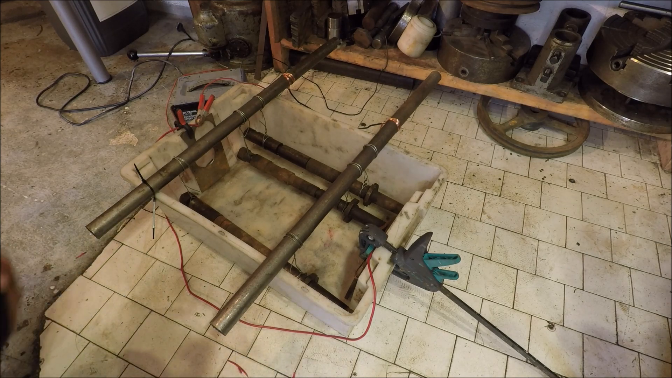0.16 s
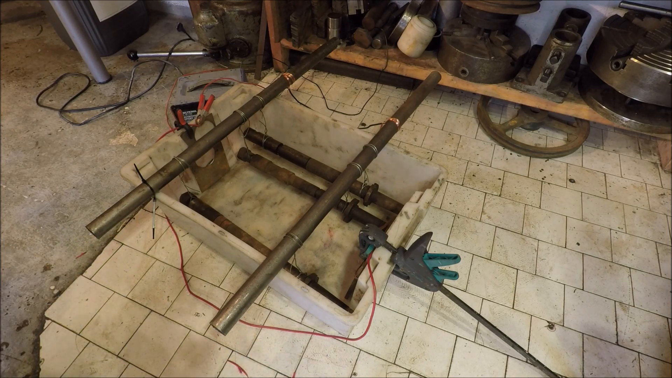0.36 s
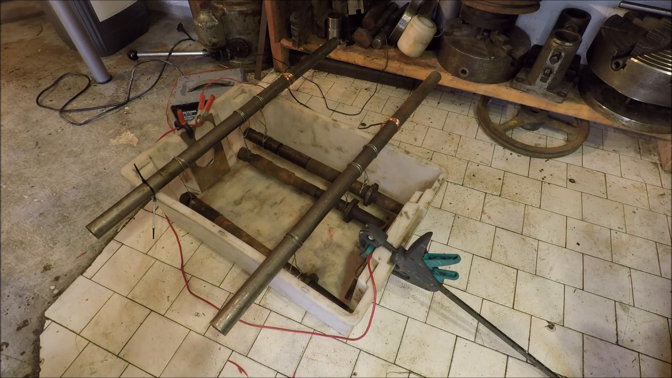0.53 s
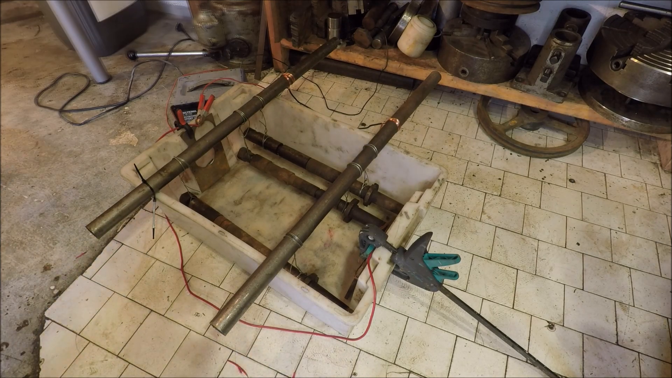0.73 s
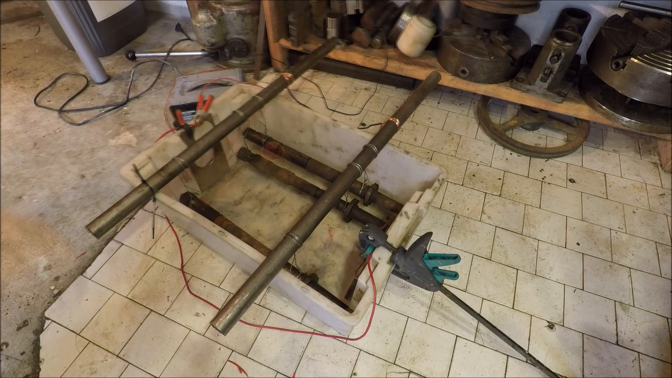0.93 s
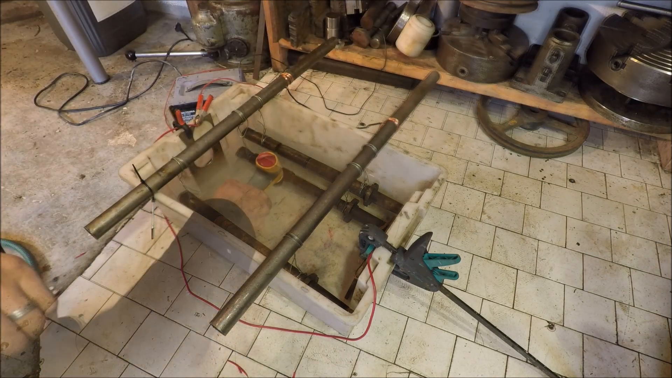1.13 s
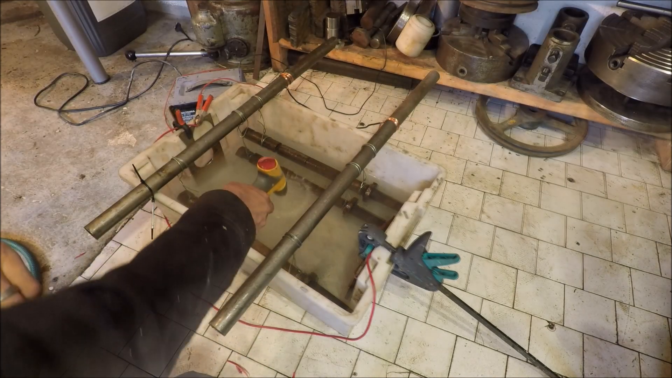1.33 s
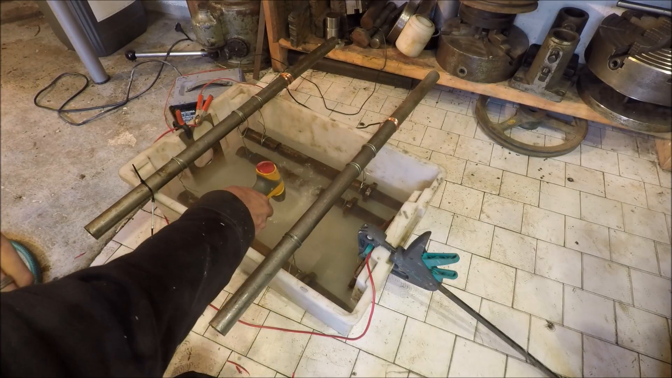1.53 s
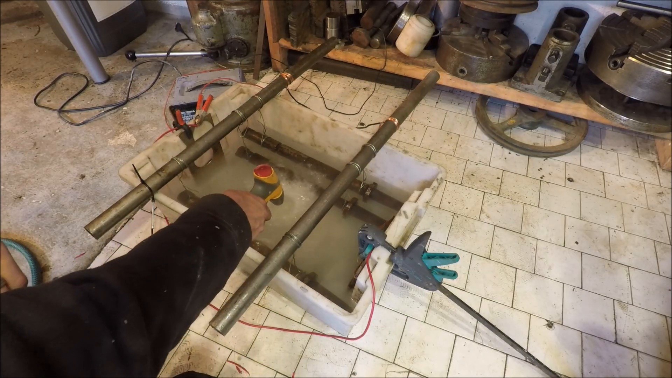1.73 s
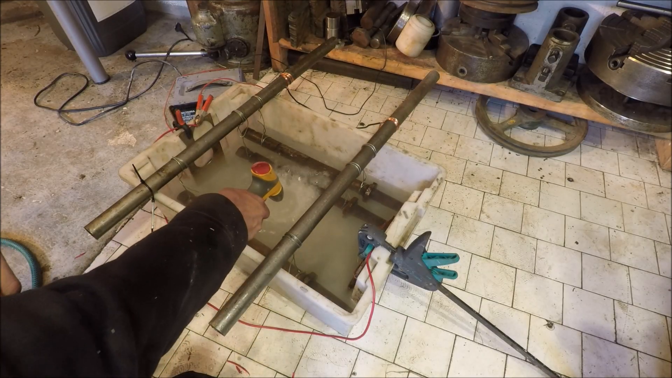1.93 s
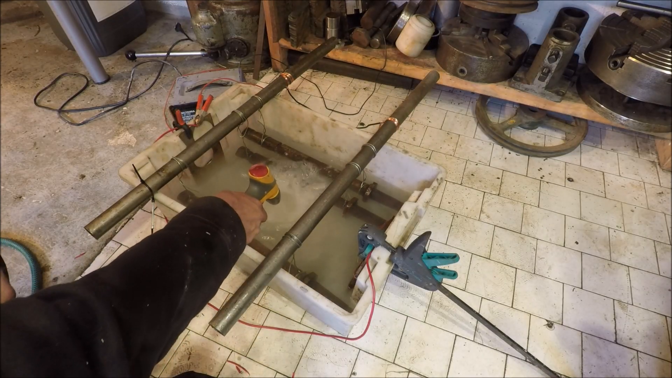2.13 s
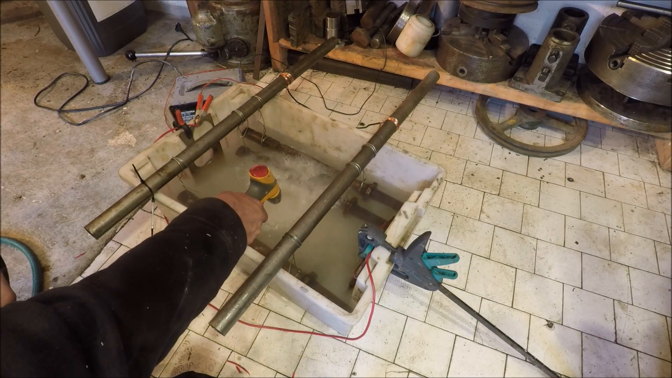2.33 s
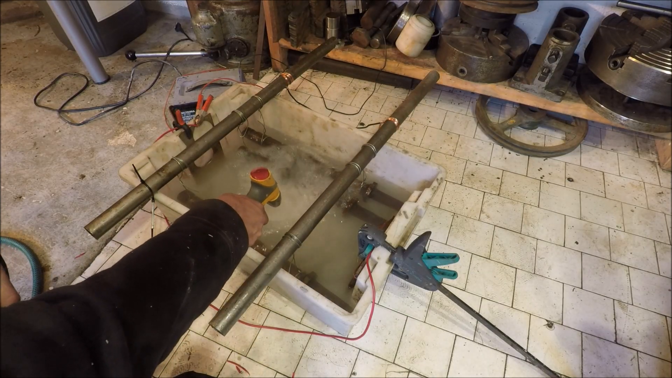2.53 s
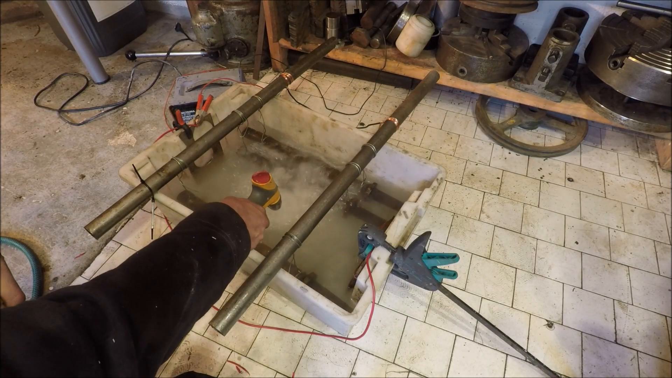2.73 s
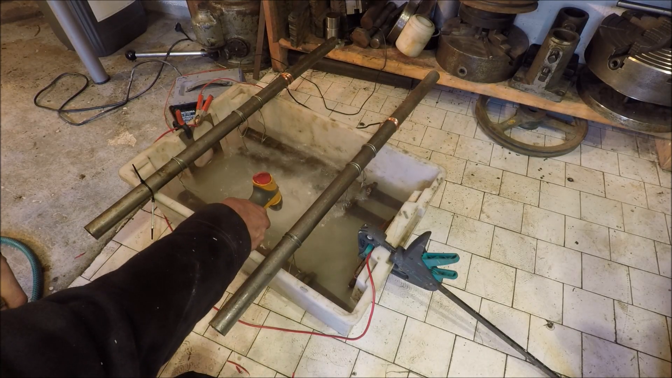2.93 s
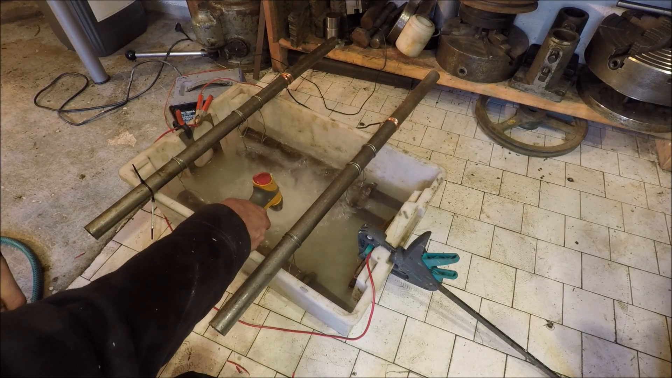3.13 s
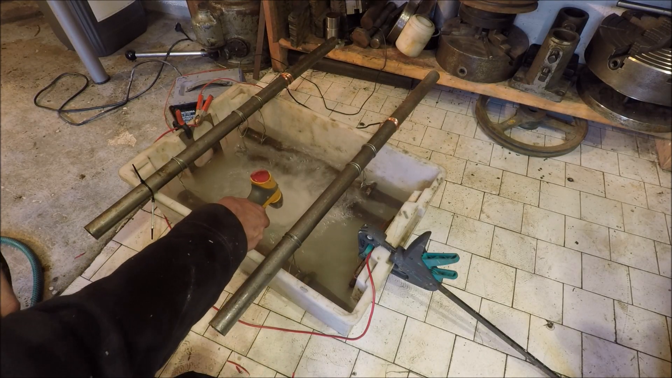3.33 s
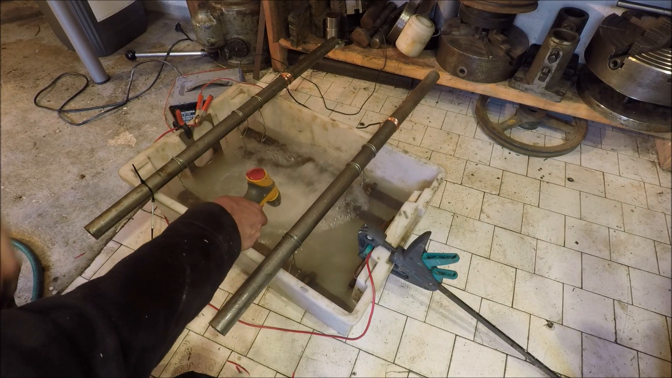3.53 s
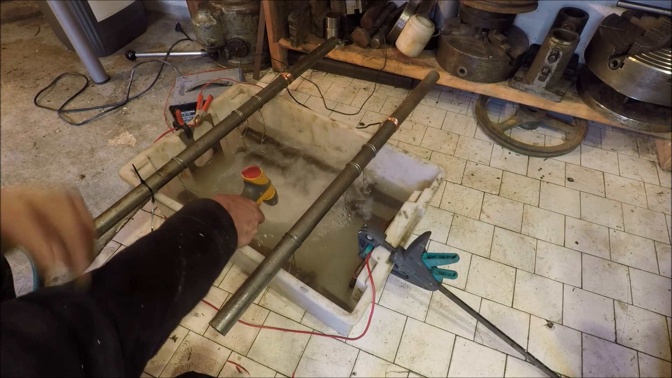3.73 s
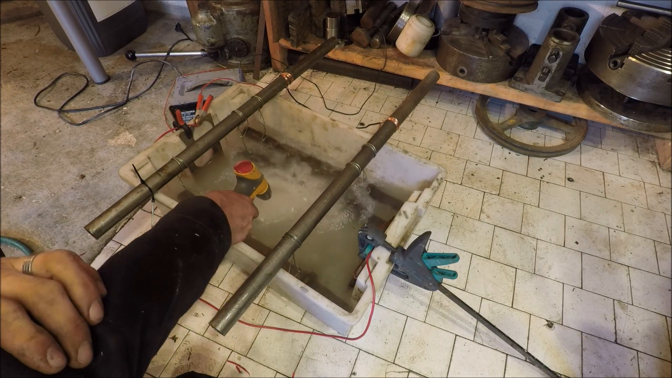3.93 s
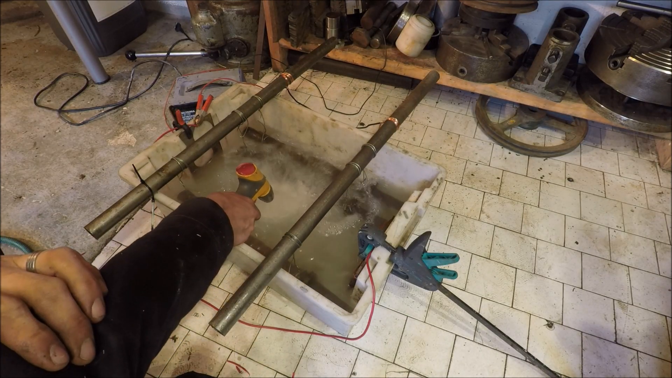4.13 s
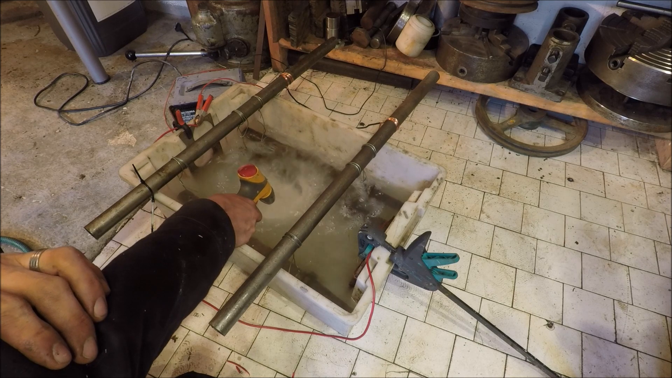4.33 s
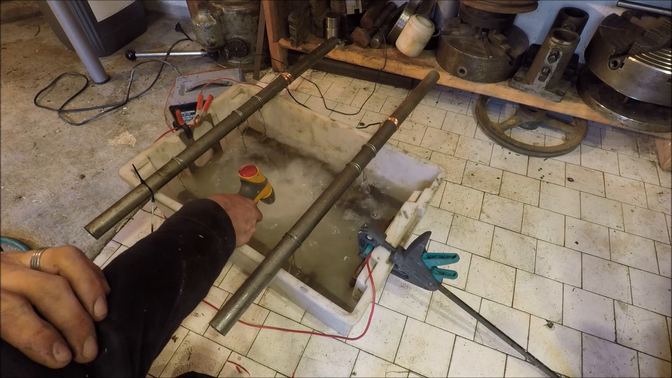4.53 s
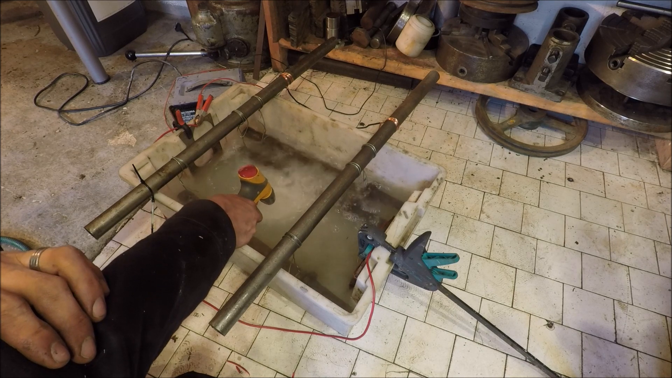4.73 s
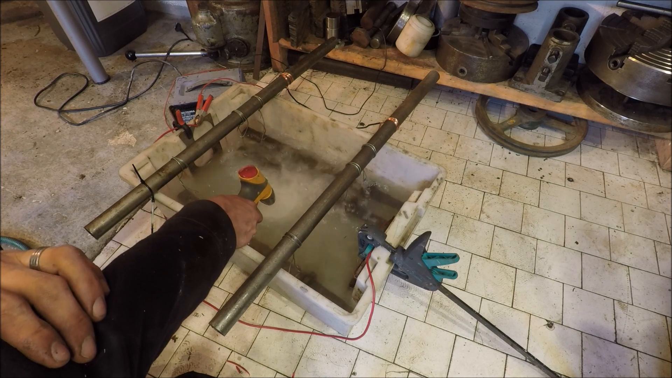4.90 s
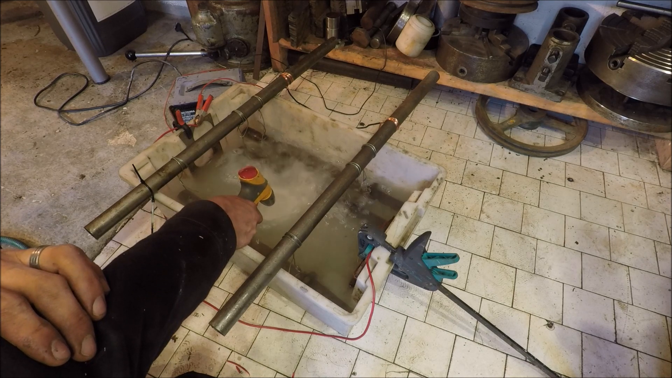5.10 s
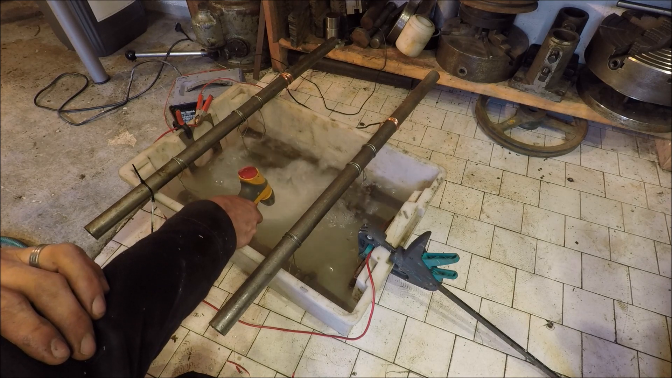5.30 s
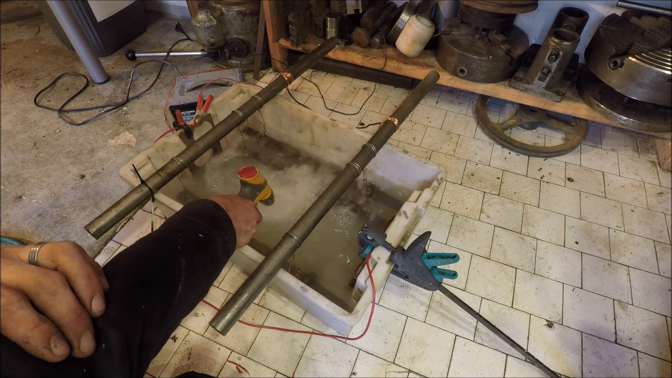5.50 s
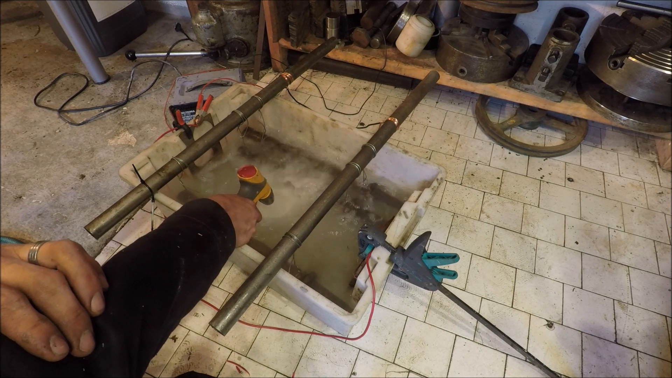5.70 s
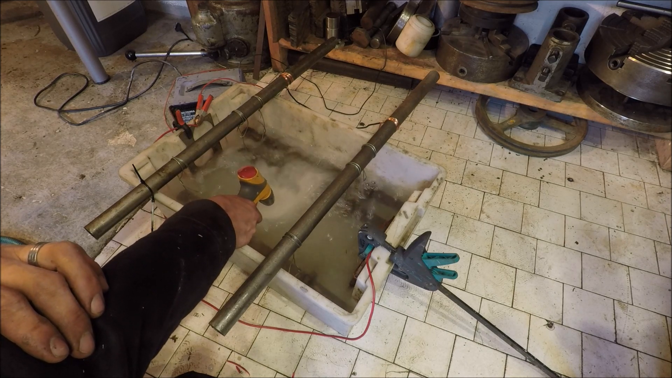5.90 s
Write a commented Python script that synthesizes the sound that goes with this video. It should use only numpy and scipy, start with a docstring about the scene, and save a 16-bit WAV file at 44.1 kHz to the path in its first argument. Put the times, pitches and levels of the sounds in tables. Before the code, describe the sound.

After brief fumbling, clicks and a ringing knock, a bright water jet bursts on and keeps splashing into a tub, its level flickering.

```python
"""A hose gun sprays into a tub of water on a workshop floor, heard by a small mono camera worn on the body.
First room noise, cloth rustling as grainy noise, and low decaying jolts; the sound cuts out once.
Then the camera sways on its mount, the gun clicks, and two knocks ring it as decaying sines.
The jet hisses as drop-laden noise with a whistle; drops patter, bubbles chirp and the tub resonates.
From the spray on, the level dips briefly many times, and a few thin tones sound in each dip."""
import sys
import numpy as np
from scipy import signal
from scipy.fft import rfft, irfft, next_fast_len
from scipy.io import wavfile
from scipy.ndimage import uniform_filter1d

SR = 44100
rng = np.random.default_rng(int(sys.argv[2]) if len(sys.argv) > 2 else 0)


def wav_out(sig):
    """Save sig, one row per channel (or a flat mono array), as 16-bit PCM at SR to the path in sys.argv[1]."""
    wavfile.write(sys.argv[1], SR, np.round(np.clip(np.atleast_2d(sig).T, -1, 1) * 32767).astype(np.int16))


N = 262836
T = np.arange(N) / SR


def undb(db):
    """Amplitude ratio of a level in dB."""
    return 10 ** (np.asarray(db) / 20)


def level(x, db):
    """Scale to an rms level in dB."""
    return x * undb(db) / np.sqrt(np.mean(x ** 2))


def colour(x, points):
    """Shape a spectrum by (frequency [Hz], level [dB]) points, falling away outside them; rms 1."""
    hz, db = np.transpose(points)
    size = next_fast_len(N)
    log_hz = np.log(np.arange(size // 2 + 1) * SR / size + 1)
    outside = np.maximum(np.log(hz[0]) - log_hz, 0) + np.maximum(log_hz - np.log(hz[-1]), 0)
    gain = undb(np.interp(log_hz, np.log(hz), db) - 52 * outside)
    return level(irfft(rfft(x, size) * gain, size)[:N], 0)


def resonance(x, hz, width_hz):
    """One resonant mode driven by x."""
    return signal.lfilter(*signal.iirpeak(hz, hz / width_hz, fs=SR), x)


def split(x, hz):
    """Parts below and above a frequency."""
    return (signal.sosfilt(signal.butter(4, hz, kind, fs=SR, output="sos"), x) for kind in ("low", "high"))


def walk(rate_hz):
    """Random levels held 1 / rate and slewed twice; spread near 1."""
    hold = max(int(SR / rate_hz), 2)
    steps = np.resize(np.repeat(rng.standard_normal(4000), hold), N)
    return 1.4 * uniform_filter1d(uniform_filter1d(steps, hold), hold)


def patter(share, spread_db):
    """Noise with drops: a share of the samples carry a hit, a few much larger."""
    hit = rng.random(N) < share
    size = undb(np.minimum(spread_db * rng.exponential(size=N), 24))
    noise = rng.standard_normal((2, N))
    return noise[0] + hit * size * noise[1]


def ring(start_s, hz, db, t60_s):
    """A struck mode: a sine that decays 60 dB in t60."""
    t = np.maximum(T - start_s, 0)
    return undb(db - 60 * t / t60_s) * np.sin(2 * np.pi * hz * t)


def hump(x):
    """One smooth hump between -.5 and .5."""
    return np.cos(np.pi * np.clip(x, -.5, .5))


def swell(peak_s, db, rise_s, fall_s):
    """Gain that climbs to a peak and fades, 10 dB in each of the given times."""
    return undb(db - 10 * np.maximum((peak_s - T) / rise_s, (T - peak_s) / fall_s))


# room noise: (frequency [Hz], relative density [dB])
ROOM_COLOUR = [(25, -5), (50, -9), (70, -11.5), (88, -1), (110, -11), (200, -12.5), (600, -17), (2000, -30),
               (6000, -52), (15000, -30)]
ROOM_DB = -40.5


def room_noise():
    """Steady room noise, mostly low, with a slowly wandering level."""
    noise = colour(rng.standard_normal(N), ROOM_COLOUR)
    return level(noise * undb(1.8 * walk(2.4)), ROOM_DB)


# cloth noise before the treble is rebalanced: (frequency [Hz], relative density [dB])
CLOTH_COLOUR = [(71, -38), (120, -6), (387, -8), (592, 0), (1590, -1.5), (3720, 0), (4290, -6),
                (5570, -5.5), (7700, -15.5), (15000, -19)]
# rubs of cloth and shoes: (loudest [s], level [dB], 10 dB swell [s], 10 dB fade [s])
CLOTH_RUBS = [(.09, -33.5, .25, .2), (.235, -26.5, .09, .13), (.375, -26.5, .06, .08),
              (.484, -15, .035, .068), (.94, -37, .1, .08), (1.13, -27, .006, .07)]
STIR_DB, RUB_TREBLE_DB = -42.5, -10.5  # faint steady stirring; treble against the body


def rustle():
    """Cloth and soles rub: grainy noise that swells and fades with each rub."""
    low, high = split(colour(patter(.04, 2.5), CLOTH_COLOUR), 7100)
    cloth = level(low, 0) + level(high, RUB_TREBLE_DB)
    rubbing = np.sqrt(undb(STIR_DB) ** 2 + sum(swell(*rub) ** 2 for rub in CLOTH_RUBS))
    return cloth * rubbing * undb(1.1 * walk(59.9))


# jolts through the mount, before the low-pass: (start [s], frequency [Hz], level [dB], t60 [s])
MOUNT_JOLTS = [(.17, 3.7, -21, 3.4), (1.151, 25.8, -10.5, 0.45), (1.15, 68, -22, 0.48),
               (1.375, 33, -9.5, 0.91), (1.5, 31.4, -18, .7), (1.5, 15, -17, 0.97), (1.8, 32, -34, 0.54)]
# pushes that widen the sway: (widest swing [s], level [dB])
SWAY_NUDGES = [(.59, -1.5), (.72, -12), (.8, -6.5), (.96, -8), (1.09, -15), (1.19, -11), (1.3, -17),
               (1.45, -16), (1.6, -14), (1.77, -5), (1.86, -13), (2.1, -29), (2.3, -31)]
SWAY_FROM_S, SWAY_HZ, SWAY_REST_DB = .558, 10.68, -50
NUDGE_SWELL_S, NUDGE_FADE_S = .05, .075  # for 10 dB


def mount():
    """Slow sway and jolts of the camera pump air at the microphone."""
    nudges = sum(swell(s, db, NUDGE_SWELL_S, NUDGE_FADE_S) for s, db in SWAY_NUDGES)
    swing = undb(SWAY_REST_DB) + nudges
    sway = -np.sin(2 * np.pi * SWAY_HZ * np.maximum(T - SWAY_FROM_S, 0)) * swing
    jolts = sum(ring(*jolt) for jolt in MOUNT_JOLTS)
    return sway + signal.sosfilt(signal.butter(2, 90, fs=SR, output="sos"), jolts)


# sharp clicks: (time [s], level [dB])
SHARP_CLICKS = [(.5665, -16), (.5703, 2), (0.6116, 6), (.616, 9.5), (1.628, -5)]


def clicks():
    """Sharp clicks reach the microphone directly: very short 9 kHz rings."""
    return sum(ring(s, 9000, db, 0.00027) for s, db in SHARP_CLICKS)


# knocks on the gun: (time [s], ring level [dB], rattle level [dB])
GUN_KNOCKS = [(1.125, -23, -21.5), (1.216, -28, -45)]
# modes of the gun: (frequency [Hz], level against the knock's ring [dB], t60 [s])
GUN_MODES = [(565, -6, 0.18), (1030, -7, 0.29), (1094, -5.5, 0.27), (2860, -12, 0.12), (3830, -11, .1),
             (5230, -11, 0.14), (5566, -10, .1)]
RATTLE_T60_S = 0.24


def knocks():
    """Knocks ring the modes of the gun, with a short rattle of decaying noise."""
    out = np.zeros(N)
    rattle_colour = [(400, 7.5), (1100, 3.5), (3000, -10), (5500, 2), (9000, -9.5), (15000, -23)]
    rattle = colour(patter(0.043, 7.7), rattle_colour)
    for s, ring_db, rattle_db in GUN_KNOCKS:
        out += sum(ring(s, hz, ring_db + db, t60) for hz, db, t60 in GUN_MODES)
        out += (T > s) * rattle * undb(rattle_db - 60 * np.maximum(T - s, 0) / RATTLE_T60_S)
    return out


SWELL_FROM_DB = -35  # at the start, under the steady level


def opening(start_s, full_s, steady_db, surge_db=0., settle_s=1.):
    """Gain after the valve opens: a quick swell, a surge that settles, then steady."""
    surge = surge_db * np.exp(-(np.maximum(T - full_s, 0) / settle_s) ** 2)
    rise = np.interp(T, [start_s, full_s], [SWELL_FROM_DB, 0])
    return (T > start_s) * undb(steady_db + rise + surge)


# hiss of the jet: (frequency [Hz], relative density [dB])
JET_COLOUR = [(1180, -14), (2000, -9.5), (2600, -8), (3060, -9.5), (3470, -7), (4330, -15.5), (5540, -7),
              (6300, -7.5), (7260, -12), (12200, -9.2), (15200, -13)]
JET_START_S, JET_FULL_S, JET_DB = 1.333, 1.364, -19.4
SURGE_DB, SURGE_S = 1.2, .15


def jet():
    """The jet tears into drops at the nozzle: noise with hits, surging at first."""
    flutter = undb(0.42 * walk(30) + .4 * walk(2))
    gain = opening(JET_START_S, JET_FULL_S, JET_DB, SURGE_DB, SURGE_S)
    return colour(patter(.03, 3.53), JET_COLOUR) * gain * flutter


NOZZLE_HZ, NOZZLE_WIDTH_HZ = 5000, 1370  # of each of two passes
WHISTLE_START_S, WHISTLE_FULL_S, WHISTLE_DB = 1.345, 1.4, -27
WHISTLE_SURGE_DB, WHISTLE_SETTLES_S = 8, .7


def whistle():
    """The nozzle resonates: drop noise through the same peak twice."""
    once = resonance(patter(0.014, 3.4), NOZZLE_HZ, NOZZLE_WIDTH_HZ)
    tone = level(resonance(once, NOZZLE_HZ, NOZZLE_WIDTH_HZ), 0)
    gain = opening(WHISTLE_START_S, WHISTLE_FULL_S, WHISTLE_DB, WHISTLE_SURGE_DB, WHISTLE_SETTLES_S)
    return tone * undb(1.4 * walk(40)) * gain


def bubbles(count=5000):
    """Bubbles trapped by the jet: short tones that glide up as they fade."""
    at, pitch, size = rng.random((count, 3)).T
    hz = 260 * undb(24 * pitch)[:, None]
    offsets = np.arange(900)
    cycles = offsets / SR * hz
    fade = np.exp(-cycles / 6.1)
    tones = np.sin(2 * np.pi * cycles * (1 + 0.01 * cycles)) * fade * undb(10 * size)[:, None]
    out = np.zeros(N + 900)
    np.add.at(out, (at * N).astype(int)[:, None] + offsets, tones)
    return out[:N]


# splash on the water, before the churn is delayed: (frequency [Hz], relative density [dB])
SPLASH_COLOUR = [(100, -47), (150, -6.5), (220, 0.5), (400, -5), (650, -2), (1000, 0), (1500, -2),
                 (2200, -3.5), (3200, -8.5), (5000, -6)]
# air and walls of the tub: (frequency [Hz], width [Hz], level against the splash [dB])
TUB_MODES = [(302.4, 20.6, -17), (363, 11.5, -21), (469, 22, -26), (872, 56, -21), (1092, 15, -17),
             (1287, 17, -18), (1855, 53, -23), (2580, 50, -18.5), (3470, 353, -8), (5367, 133, -11)]
SPLASH_START_S, SPLASH_FULL_S, SPLASH_DB = 1.39, 1.47, -21.5
CHURN_FROM_S, CHURN_RISE_S, CHURN_BELOW_HZ = 1.48, 0.3, 412


def splash():
    """Drops and bubbles strike the water and ring the tub; the low churn builds up later."""
    bubbling = colour(bubbles(), [(200, -4.5), (5000, 9.5)]) * undb(-10.5)
    drops = level(patter(.01, 3.6), 0) + bubbling
    tub = sum(level(resonance(drops, hz, width), db) * undb(2.8 * walk(9)) for hz, width, db in TUB_MODES)
    surface = colour(drops, SPLASH_COLOUR) * undb(0.73 * walk(22))
    churn, slap = split(surface + tub, CHURN_BELOW_HZ)
    water = slap + churn * np.clip((T - CHURN_FROM_S) / CHURN_RISE_S, 0, 1)
    return water * opening(SPLASH_START_S, SPLASH_FULL_S, SPLASH_DB)


FILL_FROM_HZ, FILL_S_PER_OCTAVE, FILL_FADE_S = 5000, .047, .07


def fill(x):
    """The spray starts thin: each lower octave fades in a little later than the one above."""
    def fade(octave):
        return np.clip((T - JET_START_S - octave * FILL_S_PER_OCTAVE) / FILL_FADE_S + 1, 0, 1)

    out, below = 0, x
    for octave in range(4):
        low_pass = signal.butter(2, FILL_FROM_HZ / 2 ** octave, fs=SR, output="sos")
        lower = signal.sosfiltfilt(low_pass, below)
        out = out + (below - lower) * fade(octave)
        below = lower
    return out + below * fade(4)


def spray():
    """Jet and splash fill in from the treble down, with the nozzle's whistle on top."""
    return fill(jet() + splash()) + whistle()


# brief dips of the level; the shortest do not reach the bottom: (centre [s], length [s])
LEVEL_DIPS = [(1.579, .036), (2.197, .036), (2.422, .058), (2.497, .032), (2.603, .036), (2.742, .058),
              (2.827, .056), (2.966, .032), (3.2, .038), (3.649, .038), (3.841, .034), (4.064, .058),
              (4.16, .038), (4.226, .034), (4.373, .036), (4.715, .078), (5.152, .058), (5.206, .032),
              (5.248, .036), (5.564, .034), (5.652, .036), (5.696, .032)]
# one more thin tone, higher and widely scattered: (frequency [Hz], scatter [Hz], level before scaling [dB])
HIGH_TONES = [(11500, 6000, -34)]
DIP_FADE_S, DIP_BOTTOM_DB = .019, -39
DIP_TONE_DB, DIP_TONE_SPREAD_DB, DIP_TONE_SHIFT_S = -11.5, 42, .009


def dips():
    """Gain that fades out and in, and short thin tones at scattered pitches that swell and fade around each dip."""
    gain, tones = np.ones(N), np.zeros(N)
    centres = TUB_MODES + HIGH_TONES
    # an early and a late thin tone scattered around each listed pitch
    hz, scatter, db = np.transpose(centres + centres)[:, :, None]
    late = np.repeat([-1, 1], len(centres))[:, None]
    chances = rng.random((len(LEVEL_DIPS), 3, len(hz), 1))
    for (s, length), (detune, softness, phase) in zip(LEVEL_DIPS, chances):
        near = slice(int((s - .1) * SR), int((s + .1) * SR))
        t = T[near] - s
        hollow = np.clip(1 + (np.abs(t) - length / 2) / DIP_FADE_S, undb(DIP_BOTTOM_DB), 1)
        gain[near] *= hollow
        pitch = hz + (1.12 * scatter + 0.11 * hz) * (detune - .5)
        size = undb(0.35 * db - DIP_TONE_SPREAD_DB * softness)
        shape = hump((t - DIP_TONE_SHIFT_S * late) / length)
        chord = np.sum(size * shape * np.sin(2 * np.pi * (pitch * t + phase)), axis=0)
        tones[near] += chord * (1 - hollow.min())  # deeper dips get louder tones
    return gain, tones * undb(DIP_TONE_DB)


def scene():
    """The level of room, rustle and spray dips together; tones, clicks, knocks and mount do not dip."""
    dip, tones = dips()
    dipping = (room_noise() + rustle() + spray()) * dip
    mono = dipping + mount() + clicks() + knocks() + tones
    return np.array([mono, mono])


CUT_FROM_S, CUT_TO_S, CUT_DB = .4778, .5113, -38
TOP_HZ = 15250


def record(dry):
    """One short cut-out, rounded peaks, a steep top cut."""
    cut = (T > CUT_FROM_S) & (T < CUT_TO_S)
    heard = np.tanh(0.89 * dry * np.where(cut, undb(CUT_DB), 1)) / 0.92
    return signal.sosfilt(signal.ellip(12, .2, 80, TOP_HZ, fs=SR, output="sos"), heard)


dry = scene()
out = record(dry)
wav_out(out)
```